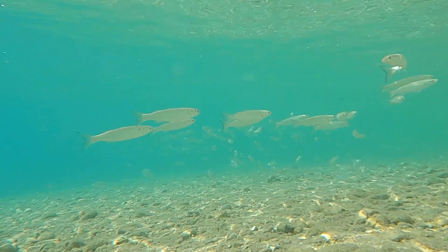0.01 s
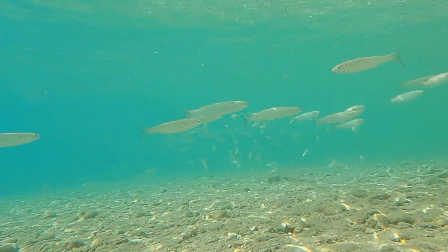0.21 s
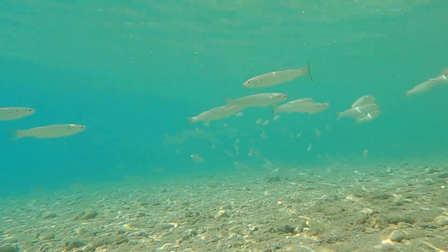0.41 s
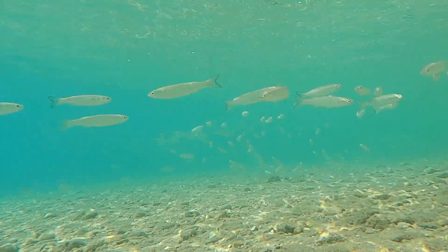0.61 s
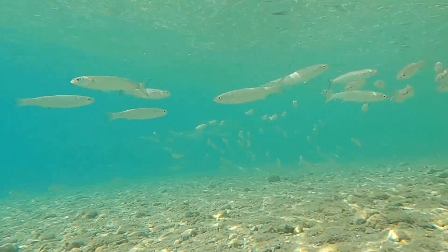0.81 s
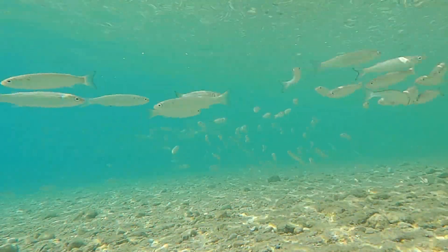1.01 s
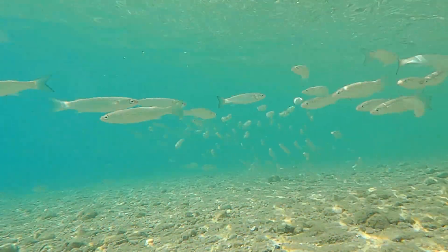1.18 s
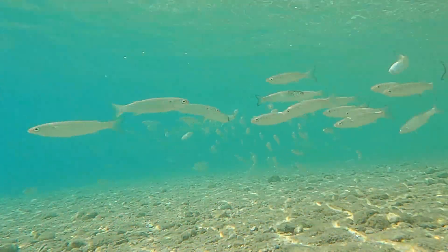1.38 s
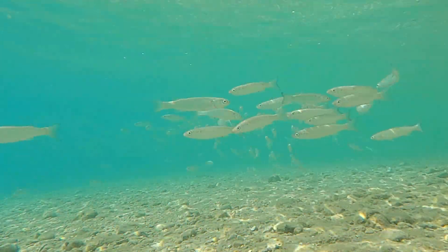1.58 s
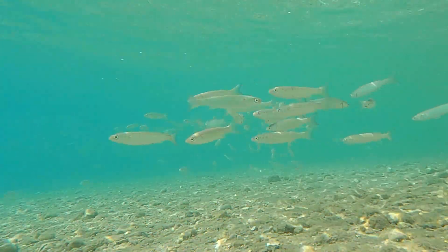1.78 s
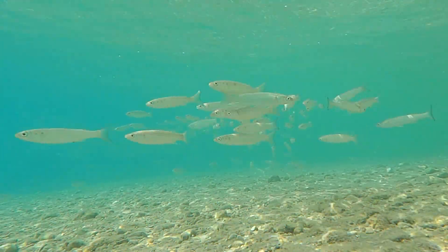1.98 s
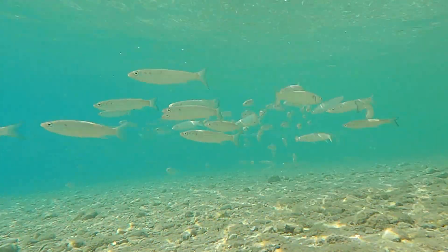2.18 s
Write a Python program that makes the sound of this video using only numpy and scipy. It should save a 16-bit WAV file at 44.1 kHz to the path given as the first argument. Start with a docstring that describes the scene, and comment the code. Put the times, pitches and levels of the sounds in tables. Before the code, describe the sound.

Underwater snapping, probably shrimp: irregular dry clicks over dense distant crackle and wavering hiss, two loud close snaps, soft low knocks and faint burbling, heard in stereo through a camera's housing in shallow sea.

```python
"""Snapping on a stony sea bed

Sharp snaps, most likely shrimp: shocks with an inverted surface echo and scatter, ringing a camera's housing.
Countless far snaps are random pulses and shaped noise: crackle and hiss. Water sways the housing with
low pushes and soft knocks (decaying sines plus dull noise), over a faint burble of swelling noise."""
import sys
import numpy as np
from scipy import signal
from scipy.fft import rfft, irfft
from scipy.io import wavfile
from scipy.ndimage import map_coordinates

SR = 44100
rng = np.random.default_rng(int(sys.argv[2]) if len(sys.argv) > 2 else 0)


def log_audio(samples):
    """Write samples as a 16-bit WAV file to the path given in sys.argv[1]."""
    # one column per channel
    frames = np.atleast_2d(samples).T
    # limit to full scale, then quantise
    limited = np.clip(frames, -1, 1)
    pcm = np.round(limited * 32767).astype(np.int16)
    wavfile.write(sys.argv[1], SR, pcm)


N = 99225
HZ = np.fft.rfftfreq(2 * N, 1 / SR)
TIME = np.arange(N) / SR


def amp(db):
    """Decibels to gain."""
    return 10 ** (np.asarray(db) / 20)


def unit(x):
    """Scale to rms 1."""
    return x / np.sqrt(np.mean(x ** 2) + 1e-20)


def along(points, hz):
    """Interpolate (Hz, value) points on a log-frequency axis."""
    f, v = np.transpose(points)
    return np.interp(np.log(hz + 1), np.log(f + 1), v)


def level(rows):
    """Interpolate (s, dB) points to a gain per sample."""
    return amp(np.interp(TIME, *np.transpose(rows)))


def wobble(knots_per_s):
    """A smooth curve through normal random knots."""
    knots = rng.standard_normal(N // 10)
    return map_coordinates(knots, [TIME * knots_per_s], mode="mirror")


def filtered(x, response):
    """Apply a response given on the HZ grid."""
    return irfft(rfft(x, 2 * N) * response)[..., :N]


def causal(gain):
    """The minimum-phase response with this gain, by folding the cepstrum."""
    cepstrum = irfft(np.log(np.maximum(gain, 1e-6)))
    half = len(cepstrum) // 2
    cepstrum[1:half] *= 2
    cepstrum[half + 1:] = 0
    return np.exp(rfft(cepstrum))


# Stereo width of the sea. Each row: frequency in Hz, side against mid in dB.
SEA_WIDTH = [(60, -33), (110, -8.5), (200, -12), (400, -4.5), (1200, -9), (4000, -17.5), (7140, -11),
             (13000, -4.5)]


def stereo(pair, response):
    """Two unrelated signals, coloured, become mid and side, then left and right; mid has rms 1."""
    width = np.array([np.ones(len(HZ)), amp(along(SEA_WIDTH, HZ))])
    mid, side = filtered(pair, response * width)
    return np.array([mid + side, mid - side]) / np.std(mid)


def noise(colour):
    """Stereo noise with this spectrum."""
    return stereo(rng.standard_normal((2, N)), amp(along(colour, HZ)))


SCATTER_RISE_S = 0.00046


def cloud(t, t60_s):
    """Two unrelated bursts of dense, dying reflections, with mean energy 1."""
    rise = (1 - np.exp(-t / SCATTER_RISE_S)) ** 2
    burst = rng.standard_normal((2, len(t))) * rise * amp(-60 * t / t60_s)
    return unit(burst) / np.sqrt(len(t))


def struck(s, db, t60_s, rise_s):
    """The envelope of something hit at s: exponential decay from db, softened by the rise."""
    t = np.maximum(TIME - s, 0)
    return amp(db - 60 * t / t60_s) * (1 - np.exp(-t / rise_s))


# Housing resonances. Each row: frequency in Hz, gain in dB.
HOUSING = [(200, -23.5), (500, -49), (720, -16), (900, -32.5), (1100, -38), (1300, -12), (1600, -3.5),
           (1850, -2), (2100, -9), (2400, -7), (2630, -5.5), (2850, -10.5), (3050, -13), (3370, -7),
           (3600, -10.5), (3980, 2.5), (4300, -8), (4600, -7), (4950, -6), (5400, -10), (5800, -15),
           (6250, -7.5), (6550, -13.5), (6900, -6.5), (7400, -13.5), (7900, -29), (8500, -25.5),
           (10300, -37), (11900, -31), (13000, -37.5), (15000, -103)]
# group lag tends to BEND_LAG_S * (BEND_HZ / hz)^2 at high hz and is longest near 530 Hz
BEND_LAG_S, BEND_HZ = 0.0018, 1500


def wall(hz):
    """The housing's resonances, behind a wall that delays low notes more than high ones."""
    lag_cycles = BEND_LAG_S * BEND_HZ ** 2 / np.hypot(hz, BEND_HZ / 2)
    return causal(amp(along(HOUSING, hz))) * np.exp(2j * np.pi * lag_cycles)


CRACKLE_PER_S, CRACKLE_SPREAD_DB, CRACKLE_DB = 200, 4.5, -61
CRACKLE_T60_S = 0.018


def crackle(patches=24, size=1024):
    """Far snaps at random moments from many patches of the bed; each patch's scatter colours its grains."""
    grains = np.zeros((2, N))
    for _ in range(patches):
        u, loud = rng.random(size), rng.standard_normal(size)
        gaps_s = -np.log(u) * patches / CRACKLE_PER_S
        at = np.cumsum(gaps_s) * SR
        gain = amp(CRACKLE_SPREAD_DB * np.minimum(loud, 1.5))
        heard = at < N
        pulses = np.bincount(at[heard].astype(int), gain[heard], N)
        scatter = cloud(TIME[:size], CRACKLE_T60_S)
        grains += signal.oaconvolve(pulses[None], scatter, axes=1)[:, :N]
    return amp(CRACKLE_DB) * stereo(grains, wall(HZ))


# Hiss spectrum. Each row: frequency in Hz, gain in dB.
HISS_COLOUR = [(260, -24.5), (500, -19), (581, -11.5), (730, -10), (772, -8), (829, -19.5), (1170, -20.5),
               (1380, -8.5), (1590, -3.3), (1850, -7), (2080, -13), (2770, -11.5), (3430, -13), (3740, -11),
               (4070, 0.5), (4430, -8.5), (5180, -7.5), (5570, -16.5), (7090, -15.5), (8170, -24.5),
               (12000, -36), (13400, -64)]
# Hiss course, before its wobble. Each row: time in seconds, level in dB.
HISS_LEVEL = [(0, -56), (.3, -58), (.55, -55), (.9, -57.5), (1.25, -59.5), (1.5, -57), (1.8, -59.5),
              (2.25, -57.5)]
# Top treble spectrum. Each row: frequency in Hz, gain in dB.
FIZZ_COLOUR = [(7000, -23), (10000, -9), (12200, 5), (13000, -8), (14000, -25)]
# Top treble course, before FIZZ_TRIM_DB. Each row: time in seconds, level in dB.
FIZZ_LEVEL = [(.25, -91), (.38, -76), (.52, -62.5), (.7, -69.5), (.88, -76), (1.15, -92), (2.25, -80)]
FIZZ_TRIM_DB, HISS_WOBBLE_DB = -9, 1.06


def hiss():
    """The farthest snaps merge into wavering noise; the top treble swells and fades."""
    waver = amp(HISS_WOBBLE_DB * wobble(13.76))
    body = level(HISS_LEVEL) * waver * noise(HISS_COLOUR)
    fizz = amp(FIZZ_TRIM_DB) * level(FIZZ_LEVEL) * noise(FIZZ_COLOUR)
    return body + fizz


# Burble spectrum. Each row: frequency in Hz, gain in dB.
BURBLE_COLOUR = [(70, -36), (110, -19), (150, 0.5), (210, 2), (260, -6), (320, -12), (450, -17.5),
                 (700, -72)]
# Burble swells. Each row: time of the height in seconds, level in dB, half length in seconds.
GURGLES = [(0.025, -59.5, 0.034), (0.09, -57, 0.028), (0.443, -59.5, 0.013), (0.808, -53, 0.031),
           (0.938, -56, 0.053), (1.391, -57, 0.052), (1.44, -57.5, 0.022), (1.879, -60, 0.044),
           (1.956, -54.5, 0.025), (2.024, -51.5, 0.017), (2.158, -57, 0.033)]
# Sway spectrum. Each row: frequency in Hz, gain in dB.
SWAY_COLOUR = [(10, -8.5), (25, -10.5), (38, 2.5), (55, -11), (80, -20), (140, -13.5), (300, -60)]
# Slow sway of the housing. Each row: time in seconds, level in dB.
SWAY_LEVEL = [(0, -55), (.08, -81), (.2, -56), (.35, -64), (.41, -52.5), (.5, -63.5), (.62, -62),
              (.85, -75), (.95, -60), (1.1, -82), (1.25, -82), (1.44, -51), (1.68, -76), (1.88, -63.5),
              (2.09, -57.5), (2.19, -76)]
BURBLE_DB = -66  # the wavering floor between swells


def water():
    """Moving water sways the housing and burbles, swelling into soft gurgles whose powers add."""
    power = amp(BURBLE_DB + wobble(29.87)) ** 2
    for s, db, half_s in GURGLES:
        swell = amp(db) * np.exp(-((TIME - s) / half_s) ** 2)
        power = power + swell ** 2
    burble = np.sqrt(power) * noise(BURBLE_COLOUR)
    return burble + level(SWAY_LEVEL) * noise(SWAY_COLOUR)


# Near snaps. Each row: start in seconds, levels at 1-3, 3-5.5 and 5.5-9 kHz in dB before SNAP_TRIM_DB,
# delay of the surface echo in seconds.
SNAPS = [(0.0794, -59, -52.5, -74, 0.001), (0.2054, -57.5, -46.5, -63, 0.0015),
         (0.3841, -31, -30.5, -39.5, 0.0011), (0.4653, -52.5, -43, -47, 0.00098),
         (0.5216, -60, -43.5, -47.5, 0.0013), (0.6336, -60, -54, -54, 0.0011),
         (0.6704, -53.5, -47.5, -49, 0.0013), (0.733, -44.5, -41, -84, 0.0012),
         (0.758, -49, -41, -61, 0.0015), (0.8289, -51.5, -46.5, -55.5, 0.002),
         (0.9691, -62, -43, -54, 0.0014), (1.114, -45.5, -41, -48.5, 0.0022),
         (1.2234, -57, -48, -62, 0.0012), (1.3228, -77, -51.5, -60, 0.0011),
         (1.3304, -54.5, -41.5, -61, 0.001), (1.3717, -69, -50.5, -65, 0.001),
         (1.4121, -30, -27.5, -38.5, 0.001), (1.4357, -35.5, -36, -53, 0.0023),
         (1.498, -55, -40.5, -76, 0.0014), (1.6285, -73, -49, -57, 0.0038), (1.651, -60, -56, -67, 0.0032),
         (1.6767, -49.5, -45, -54.5, 0.00107), (1.938, -77, -49, -53.5, 0.0011),
         (1.9651, -53, -52.5, -59, 0.0017), (1.9845, -50.5, -36, -51, 0.0014),
         (1.9912, -63, -51, -60, 0.002), (2.0233, -52, -42.5, -52, 0.001), (2.065, -61, -47, -68, 0.0021),
         (2.1228, -68, -51.5, -67, 0.0019), (2.218, -68, -48.5, -58.5, 0.0011)]
# Tail spectrum, on top of TAIL_DB. Each row: frequency in Hz, gain in dB.
TAIL_COLOUR = [(1500, 4.5), (3000, 5.5), (4200, 1), (8000, 1)]
BAND_EDGES_HZ, BAND_BLEND = [1100, 3100, 5600, 9000], 1.18
SNAP_TRIM_DB, ECHO_GAIN = -2, 0.48
SCATTER_DB, SCATTER_S = 7.5, 0.011  # off the stones nearby; level before the fade
TAIL_DB, TAIL_T60_S = -6, 0.1  # between bed and surface
LEVEL_SPAN_S = 0.01  # span over which a band's energy counts as its level


def snaps(size=4096):
    """Each snap is a shock, its inverted surface echo and scatter off the bed, all ringing the housing."""
    out = np.zeros((2, N + size))
    t, hz = np.arange(size) / SR, np.fft.rfftfreq(size, 1 / SR)
    housing, width = wall(hz), causal(amp(along(SEA_WIDTH, hz)))
    tail_gain = amp(TAIL_DB + along(TAIL_COLOUR, hz))
    bands = list(zip(BAND_EDGES_HZ, BAND_EDGES_HZ[1:]))
    for s, *levels_db, delay_s in SNAPS:
        scatter = rfft(cloud(t, SCATTER_S))
        flat = irfft(scatter / abs(scatter))  # the stones favour no pitch
        even = flat * np.exp(-(t / SCATTER_S) ** 2)
        paths = amp(SCATTER_DB) * rfft(even) + tail_gain * rfft(cloud(t, TAIL_T60_S))
        paths[0] += 1 - ECHO_GAIN * np.exp(-2j * np.pi * hz * delay_s)
        snap = paths * housing
        # tint: steer each band of the mid towards its level
        tint = []
        for (lo, hi), db in zip(bands, levels_db):
            energy = 2 * np.sum(abs(snap[0, (hz > lo) & (hz < hi)]) ** 2) / size
            gain_db = db - 10 * np.log10(energy / (LEVEL_SPAN_S * SR))
            tint += [(lo * BAND_BLEND, gain_db), (hi / BAND_BLEND, gain_db)]
        snap = snap * causal(amp(along(tint, hz)))
        mid, side = irfft(snap[0]), irfft(snap[1] * width)
        out[:, round(s * SR):][:, :size] += [mid + side, mid - side]
    return amp(SNAP_TRIM_DB) * out[:, :N]


# Pushes of water. Each row: time of the height in seconds, frequency in Hz, peak in dB, half length in seconds.
SURGES = [(0.204, 38, -42, 0.0294), (0.265, 34.2, -38.5, 0.033), (0.274, 61.5, -44.5, 0.046),
          (0.763, 38.6, -39.5, 0.042)]
# Soft knocks. Each row: start in seconds, frequency in Hz, level in dB before the rise, T60 in seconds.
KNOCKS = [(0.221, 129.6, -29, 0.11), (0.22, 339, -54, 0.057), (0.288, 140, -48, 0.15),
          (0.371, 105, -45.5, 0.085), (.517, 157, -44.5, 0.083), (0.516, 343, -48, 0.043),
          (.692, 133, -50, 0.14), (.741, 690, -50, 0.06), (.746, 230, -34, 0.063), (.746, 485, -48, 0.057),
          (0.751, 92, -43.5, 0.16), (0.791, 143.4, -46.5, 0.16), (.79, 275, -48, 0.061),
          (.832, 120, -47.5, 0.077), (1.668, 206, -46, 0.084), (2.01, 235, -45.5, 0.063),
          (2.02, 564, -53, 0.051)]
# Thud spectrum. Each row: frequency in Hz, gain in dB.
THUD_COLOUR = [(40, -9), (90, 0), (200, 0.5), (350, -3), (700, -39), (1200, -23), (2500, -60)]
KNOCK_RISE_S, KNOCK_ROUGH_RAD = 0.0027, 0.62
THUD_DB, THUD_T60_S = -16, 0.071  # dull contact noise, relative to its knock


def knocks():
    """Pushes of water rock the housing, and it knocks softly: rough-phased sines plus contact noise."""
    out, thud = np.zeros(N), np.zeros(N)
    for s, hz, db, half_s in SURGES:
        push = amp(db) * np.exp(-((TIME - s) / half_s) ** 2)
        out += push * np.sin(2 * np.pi * hz * (TIME - s) + KNOCK_ROUGH_RAD * wobble(40.7))
    for s, hz, db, t60_s in KNOCKS:
        tone = np.sin(2 * np.pi * hz * (TIME - s) + KNOCK_ROUGH_RAD * wobble(110))
        out += struck(s, db, t60_s, KNOCK_RISE_S) * tone
        thud += struck(s, db + THUD_DB, THUD_T60_S, KNOCK_RISE_S)
    return out + thud * noise(THUD_COLOUR)


# Housing modes left ringing. Each row: start in seconds, frequency in Hz, level in dB before the rise,
# T60 in seconds.
RINGS = [(.3855, 1820, -24, 0.019), (.384, 2220, -16.5, .011), (0.385, 2620, -24, 0.031),
         (.3847, 3950, -2, 0.0081), (1.1155, 1358, -31, 0.031), (1.116, 1786, -27, 0.023),
         (1.114, 4080, -21.5, 0.018), (1.1138, 4510, -14, 0.01), (1.116, 4980, -20.5, 0.014),
         (1.4143, 1600, -28, 0.036), (1.4135, 2640, -27, 0.042), (1.437, 1620, -29.5, 0.03),
         (1.6767, 2660, -40, 0.022), (1.9845, 4980, -29.5, .012), (1.8, 4600, -36, .014)]
RING_RISE_S, RING_LOW_CUT_HZ = 0.0017, 1250


def rings():
    """The housing's modes ring on briefly, mostly at hard snaps, cut steeply below the lowest mode."""
    modes = np.zeros(N)
    for s, hz, db, t60_s in RINGS:
        modes += struck(s, db, t60_s, RING_RISE_S) * np.sin(2 * np.pi * hz * (TIME - s))
    return signal.sosfilt(signal.butter(6, RING_LOW_CUT_HZ, "high", fs=SR, output="sos"), modes)


# Unequal paths through the housing to its two microphones. Each row: frequency in Hz,
# left over right in dB, left lead in radians.
PORTS = [(150, .5, 0), (302, -2, -0.082), (626, 3, -.9), (1260, -1.5, -1.57), (1660, 9.5, -0.22),
         (1800, 0, 0.75), (2060, -8, 0), (2230, 3.5, -0.55), (2750, 5.5, -1.03), (3100, 0, -1.3),
         (3300, 10, -0.93), (3660, -4, -0.55), (3900, 1, -.1), (4500, 0, -0.38), (5000, -2, 0.0013),
         (6700, -1.5, 0.13), (8900, 3, 0.48)]


def scene():
    """Everything reaches two microphones through the housing, each with its own strength and phase."""
    hz, lean_db, lead_rad = np.transpose(PORTS)
    lean = amp(along(np.c_[hz, lean_db], HZ))
    ratio = lean * np.exp(1j * along(np.c_[hz, lead_rad], HZ))
    ports = np.array([2 * ratio, np.full(len(HZ), 2)]) / (1 + ratio)  # left and right average to 1
    sea = crackle() + hiss() + water() + snaps() + knocks() + rings()
    return filtered(sea, ports)


TOP_HZ = 13700


def record(dry):
    """The camera's band limit: a very steep low-pass at TOP_HZ."""
    return filtered(dry, 1 / np.sqrt(1 + (HZ / TOP_HZ) ** 60))


dry = scene()
out = record(dry)
log_audio(out)
```